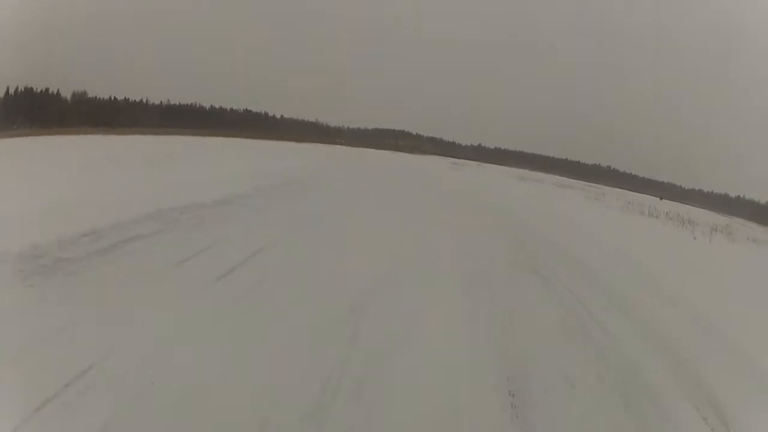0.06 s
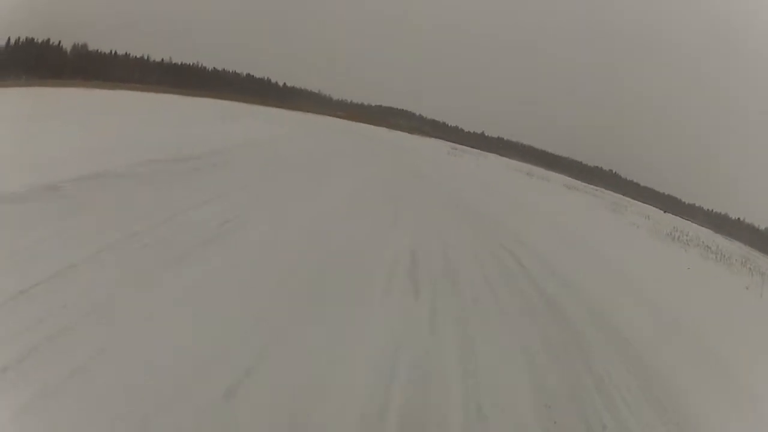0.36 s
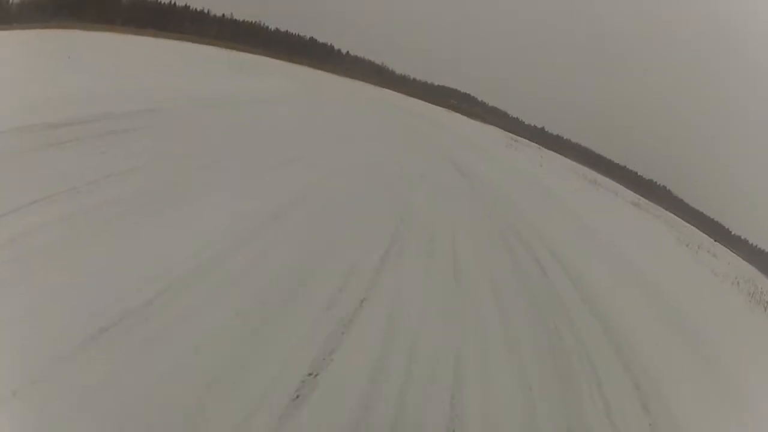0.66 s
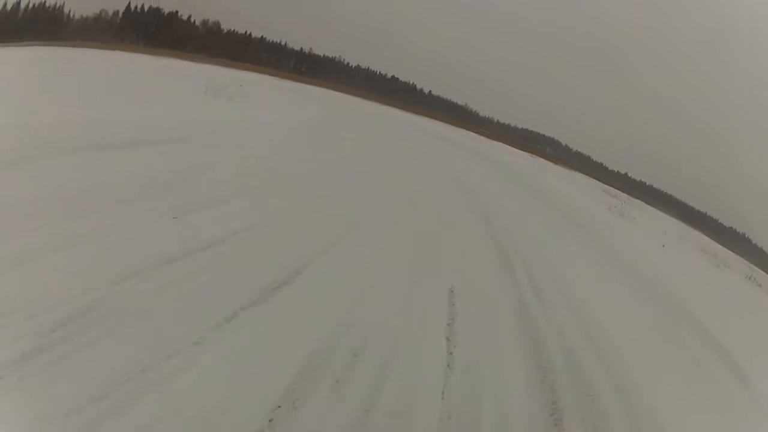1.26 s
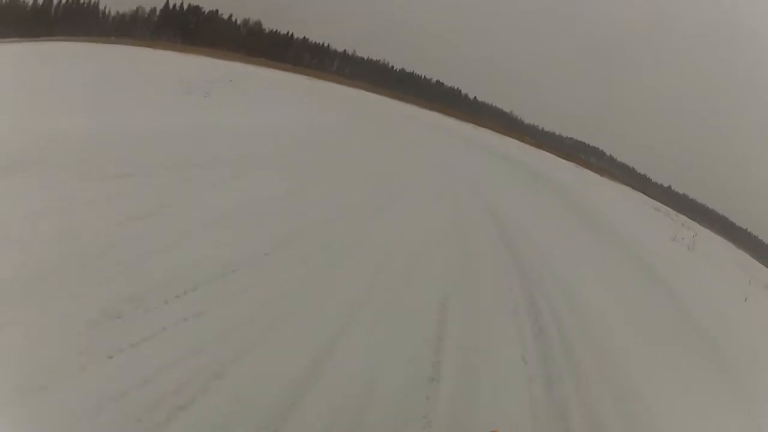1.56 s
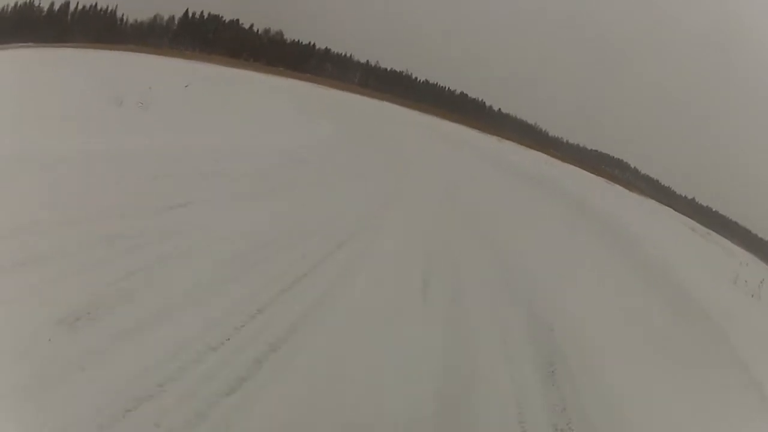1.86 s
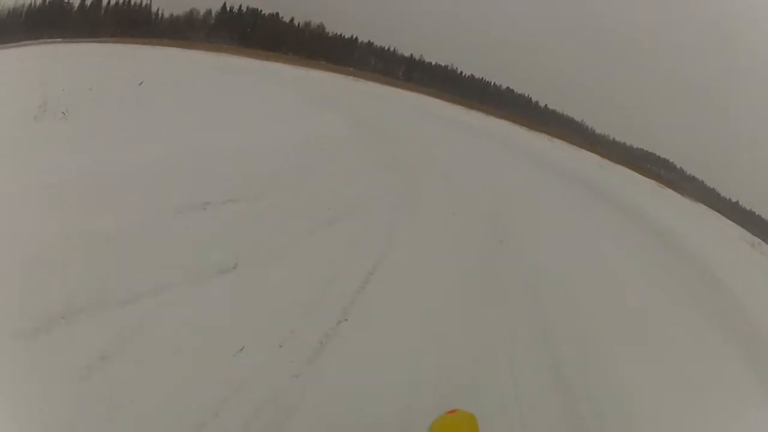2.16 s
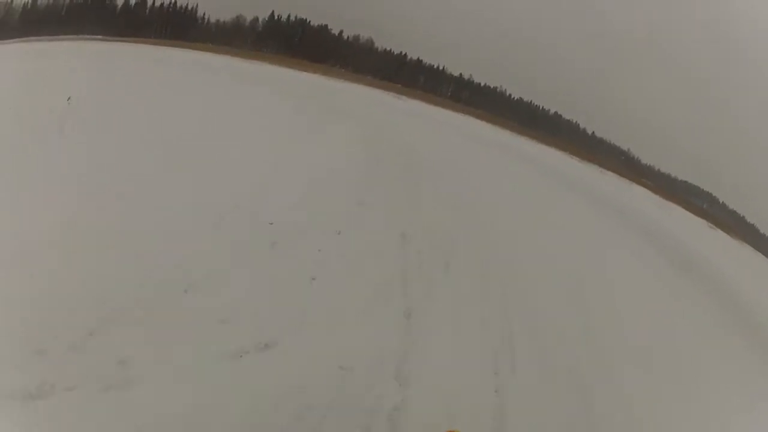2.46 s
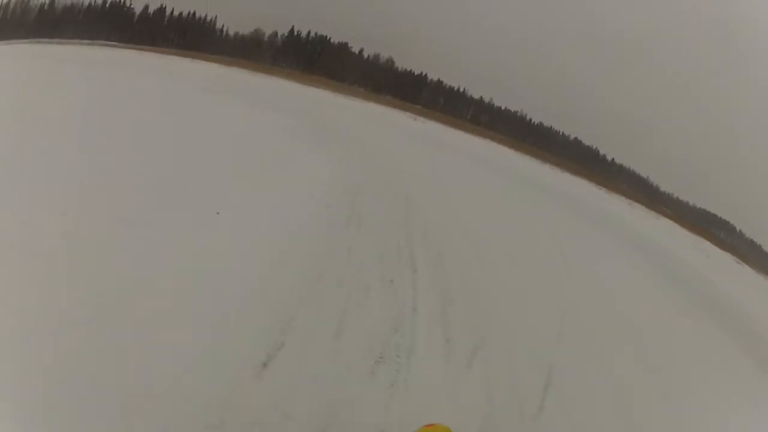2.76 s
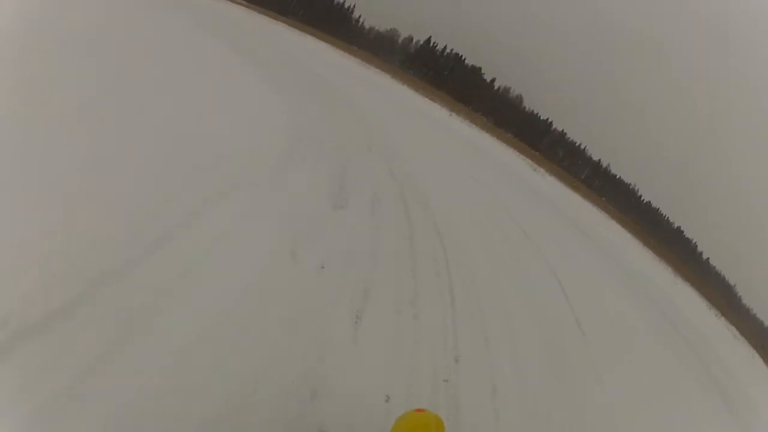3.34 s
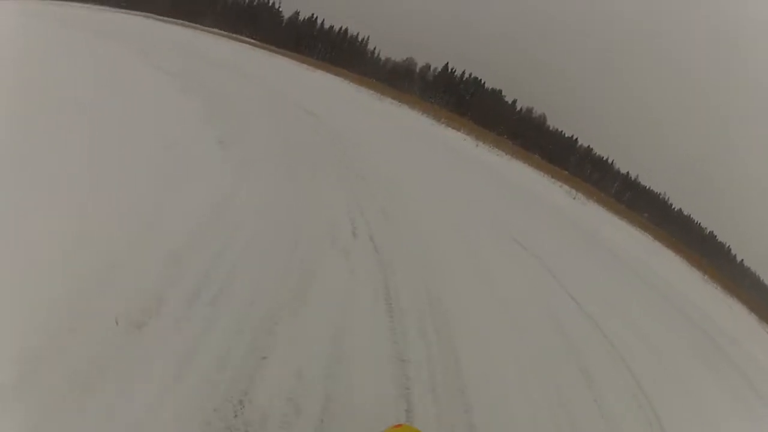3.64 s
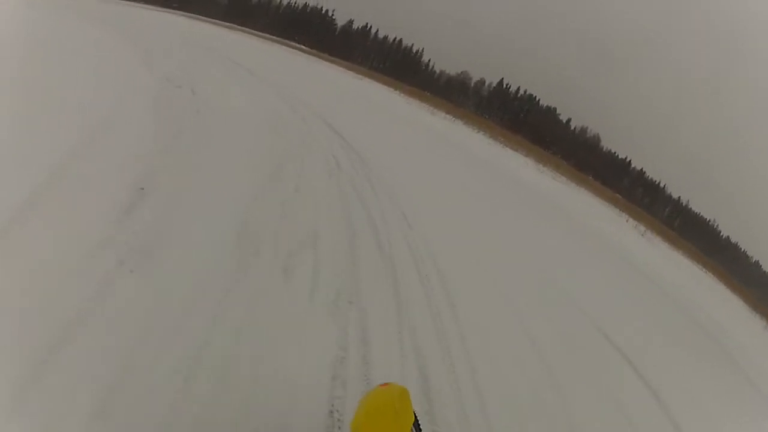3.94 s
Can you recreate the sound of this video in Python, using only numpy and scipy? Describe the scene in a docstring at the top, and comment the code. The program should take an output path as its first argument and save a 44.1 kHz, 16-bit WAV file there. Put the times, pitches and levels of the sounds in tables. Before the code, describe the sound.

Gear scrapes over ice under a light vehicle, rumbling, then knocking and chattering through a skid.

```python
"""On a frozen lake, microphone on board a light vehicle, close to the running gear.
The ice scrapes through the ringing gear, fading as the vehicle slows into a turn.
Bumps make the frame boom and rumble; ice chips tick against it and the gear takes two hard knocks.
In the turn it skids and chatters sideways, in stick-slip bursts that merge into a low buzz."""
import sys
import numpy as np
from scipy.fft import rfft, irfft, next_fast_len
from scipy.io import wavfile
from scipy.ndimage import uniform_filter1d, map_coordinates

SR = 44100
rng = np.random.default_rng(int(sys.argv[2]) if len(sys.argv) > 2 else 0)


def to_wav(s):
    """Save 16-bit WAV."""
    ch = np.atleast_2d(s).T  # columns
    pcm = np.round(np.clip(ch, -1, 1) * 32767)  # PCM
    wavfile.write(sys.argv[1], SR, pcm.astype(np.int16))


N = 176400  # 4 s


def amp(db):
    """Decibels to gain."""
    return 10 ** (np.asarray(db) / 20)


def unit(x):
    """x scaled to rms 1."""
    return x / np.sqrt(np.mean(x ** 2) + 1e-20)


def since(start):
    """Seconds since start at each sample, zero before it."""
    return np.maximum(np.arange(N) / SR - start, 0)


def curves(rows):
    """One value per sample for each column after the time."""
    times, *columns = np.transpose(rows)
    return [np.interp(np.arange(N) / SR, times, column) for column in columns]


def wobble(rate):
    """A smooth random curve, rate knots a second."""
    knots = rng.standard_normal(int(N * rate / SR) + 4)
    return map_coordinates(knots, [np.arange(N) * rate / SR])


def filtered(x, response):
    """x through a gain given as a function of frequency."""
    size = next_fast_len(N + SR // 2)
    return irfft(rfft(x, size) * response(np.fft.rfftfreq(size, 1 / SR)), size)[:N]


def coloured(x, points):
    """x shaped by (f/Hz, level/dB) points on a log frequency axis, at rms 1."""
    f, db = np.transpose(points)
    return unit(filtered(x, lambda hz: amp(np.interp(np.log(hz + 1), np.log(f), db))))


def noise(points):
    """Coloured noise of rms 1."""
    return coloured(rng.standard_normal(N), points)


def evened(x, size):
    """x with chance swells longer than size samples levelled out, at rms 1."""
    power = np.abs(uniform_filter1d(x ** 2, size))
    return unit(x / np.sqrt(power + 1e-6))


def crunches(rows, colour, attack_s, rough_db):
    """Short gritty bursts that rise quickly and die away over their length."""
    envelope = np.zeros(N)
    for start, db, length in rows:
        age = since(start)
        envelope += amp(db) * (1 - np.exp(-age / attack_s)) * np.exp(-(age / length) ** 2)
    grit = rng.standard_normal(N) * amp(rough_db * wobble(900))
    return envelope * evened(coloured(grit, colour), size=300)


def roll(level_db=-42.5, sway_db=0.15):
    """A steady bed of rolling noise and air."""
    # spectrum of the bed: f/Hz, level/dB
    colour = [(30, -22), (130, 4), (200, -1), (300, -0.5), (400, -7.5), (540, -7), (680, -6), (850, -16),
              (1600, -21), (2300, -13.5), (3200, -19), (4500, -30), (6000, -32), (7000, -37),
              (10000, -21.5), (12000, -28), (15000, -28)]
    return amp(level_db + sway_db * wobble(8.2)) * noise(colour)


def drone():
    """Two hollow resonances of the body, shaken by the uneven ice."""
    # strength of the resonances: t/s, lower level/dB, upper level/dB
    levels = [(0, -40, -56), (0.7, -41.5, -46), (1.05, -41.5, -48), (1.38, -38, -41), (1.6, -43.5, -47),
              (2.2, -41, -51), (2.5, -51, -46), (3.3, -54, -50), (4, -58, -56)]
    # lower resonance: f/Hz, level/dB
    lower = [(130, -38), (165, 5), (192, 3.5), (225, -10), (270, -10), (400, -50), (1500, -90)]
    # upper resonance: f/Hz, level/dB
    upper = [(250, -36), (350, -12.5), (405, 1.5), (460, -2.5), (600, -40), (2000, -90)]
    lower_db, upper_db = curves(levels)
    return amp(lower_db) * noise(lower) + amp(upper_db) * noise(upper)


def sing(width_hz=50):
    """The sliding gear sings in a narrow band that sinks with the speed."""
    # centre of the band: t/s, f/Hz, level/dB
    track = [(0, 729.6, -40), (1, 715.7, -43), (1.3, 690, -44), (1.39, 725, -42), (1.48, 707, -44),
             (1.82, 715, -42), (2, 703.8, -45), (3, 698.4, -47), (3.5, 679, -48.5), (4, 649, -52.5)]
    hz, level_db = curves(track)
    band = wobble(2 * width_hz) + 1j * wobble(2 * width_hz)
    carrier = np.exp(2j * np.pi * np.cumsum(hz) / SR)
    return amp(level_db) * unit(np.real(band * carrier))


def skid():
    """A dull rasp while the vehicle slides sideways."""
    # swell in the turn: t/s, level/dB
    levels = [(3.5, -70), (3.66, -46.5), (3.8, -46.5), (4, -43)]
    # spectrum of the rasp: f/Hz, level/dB
    colour = [(600, -42), (1200, -7), (1650, 7), (1950, -5), (2250, -2), (2800, -17), (3500, -14),
              (5000, -30), (9000, -50)]
    level_db, = curves(levels)
    return amp(level_db) * noise(colour)


def chips():
    """Ice chips tick against the vehicle."""
    # hits: t/s, level/dB, length/s
    hits = [(2.776, -39.5, 0.0089), (2.8685, -30, 0.0044), (2.876, -28.5, .012), (2.920, -34.5, .011),
            (2.996, -27, .005), (3.053, -37, 0.01), (3.152, -36.5, 0.013), (3.182, -41, .01),
            (3.212, -42, 0.0086), (3.481, -42.5, 0.0077), (3.556, -45, .008), (3.604, -41.5, 0.013),
            (3.824, -37, 0.014), (3.864, -36.5, 0.0093)]
    # spectrum of a tick: f/Hz, level/dB
    colour = [(500, -40), (2500, -24), (3500, 3), (4200, 1), (5200, -6), (6000, -15), (7000, -7),
              (8300, -4.5), (9500, -19), (15000, -32)]
    return crunches(hits, colour, attack_s=0.0012, rough_db=4.5)


def knocks():
    """Hard knocks on the gear: a crack, then a brief ring."""
    # hits: t/s, level/dB, crack length/s
    hits = [(3.0042, -24, .0035), (3.1415, -29.5, .006)]
    # spectrum of the crack: f/Hz, level/dB
    colour = [(100, -14), (700, -4), (1400, 0), (2300, 0), (3500, -6), (5000, -10), (6000, -16),
              (7000, -12), (10000, -14), (12000, -27), (14500, -17)]
    # modes of the gear: f/Hz, level/dB relative to the hit, t60/s
    modes = [(740, -8, .035), (980, -8, .03), (1290, -2, .035), (1720, -6, .03), (2240, -3, .03)]
    out = crunches(hits, colour, attack_s=0.00029, rough_db=2)
    for start, hit_db, _ in hits:
        age = since(start)
        for hz, mode_db, t60 in modes:
            out += amp(hit_db + mode_db - 60 * age / t60) * np.sin(2 * np.pi * hz * age)
    return out


def thuds(ring_hz=117, t60_s=0.22):
    """Single bumps set the frame ringing, low and dull."""
    # bumps: t/s, level/dB
    bumps = [(2.395, -24), (3.143, -26), (3.872, -25)]
    out = np.zeros(N)
    for start, db in bumps:
        age = since(start)
        out += amp(db - 60 * age / t60_s) * np.sin(2 * np.pi * ring_hz * age)
    return out


def frame(rumble_lift_db=2.0):
    """A run of bumps keeps the frame's low resonance booming over a deep rumble."""
    # surges of the boom: t/s, level/dB
    boom_levels = [(0.0, -29.5), (0.1, -23), (0.13, -36), (0.18, -27.5), (0.52, -27.5), (0.56, -35),
                   (0.58, -25.5), (0.95, -33), (0.96, -27.5), (1.16, -38.5), (1.27, -30.5), (1.34, -50),
                   (1.37, -36.5), (1.67, -30), (1.7, -38), (1.79, -26.5), (1.85, -44), (1.87, -36),
                   (2.0, -30), (2.04, -39.5), (2.29, -27), (2.33, -36), (2.41, -41), (2.44, -42),
                   (2.94, -35), (3.01, -44), (3.06, -31), (3.46, -50.5), (3.62, -40), (3.82, -49),
                   (3.89, -29), (4.0, -50)]
    # resonance of the frame: f/Hz, level/dB
    boom_colour = [(40, -38), (75, -8), (100, -3.5), (117, 6.5), (135, -4), (160, -19.5), (200, -19.5),
                   (280, -47), (600, -52.5)]
    # swells of the rumble: t/s, level/dB before the lift
    rumble_levels = [(0, -40), (0.035, -39), (0.08, -39), (0.3, -39), (0.6, -40), (1, -37.5), (1.45, -44),
                     (1.8, -46), (2.1, -43), (2.8, -43.5), (3, -37), (3.22, -34), (3.35, -46), (3.6, -46),
                     (3.67, -37), (3.75, -38), (3.88, -38), (4, -50)]
    # spectrum of the rumble: f/Hz, level/dB
    rumble_colour = [(8, -1), (22, 2), (32, -5.5), (48, -7.5), (68, -1), (90, -8), (150, -13), (400, -57)]
    boom_db, = curves(boom_levels)
    rumble_db, = curves(rumble_levels)
    boom = amp(boom_db) * evened(noise(boom_colour), size=2200)
    rumble = amp(rumble_db + rumble_lift_db) * evened(noise(rumble_colour), size=4400)
    return boom + rumble


def chatter(centre_hz=306, sweep_s_per_hz=1.6e-5, fade_db_per_s=600, scatter_db=0.5):
    """Stick and slip: each slip is a bending wave, highs arriving first; a burst holds, then dies."""
    # bursts: t/s, hold/s, peak level/dB, slip rate/Hz, pitch ratio
    bursts = [(1.93, .001, -28.5, 79, 1.54), (2.006, .001, -26, 76, 1.33), (2.055, 0.033, -29.5, 76, 1.27),
              (2.091, 0.031, -25.5, 77, 1.06), (2.1675, 0.0095, -21.5, 76, 1.15),
              (2.232, 0.009, -27.5, 72, 1.25), (3.555, .001, -29.5, 68, 0.96),
              (3.5994, .017, -22.5, 65, 0.94), (3.628, 0.019, -27, 69.8, 0.89),
              (3.661, 0.0057, -19.5, 69, 1), (3.7043, 0.0057, -19.5, 72, 1), (3.7638, 0.011, -19.5, 68, 1),
              (3.8072, .22, -21.5, 71, 1)]
    # spectrum of a slip at pitch ratio 1: f/Hz, level/dB
    colour = [(100, -30), (150, -19), (205, 1), (285, 1), (355, 1), (425, -10), (500, -14), (570, -20),
              (650, -16), (850, -31), (1500, -60)]
    colour_hz, colour_db = np.transpose(colour)
    out, size = np.zeros(N + SR), 4096
    for start, hold, db, rate, ratio in bursts:
        hz = np.fft.rfftfreq(size, 1 / SR) / ratio  # transposes both colour and sweep
        gain = amp(np.interp(hz, colour_hz, colour_db, right=-120))
        dispersion = np.exp(1j * np.pi * sweep_s_per_hz * (hz - centre_hz) ** 2)
        slip = np.fft.fftshift(irfft(gain * dispersion))
        slip /= np.abs(slip).max()
        for age in np.arange(int(hold * rate) + 4) / rate:
            level_db = db - fade_db_per_s * max(age - hold, 0) + scatter_db * rng.standard_normal()
            first = round((start + age) * SR) - size // 2
            out[first:first + size] -= amp(level_db) * slip
    return out[:N]


def scrape(grains_per_s=900, grain_db=-8, flutter_db=0.49, judder_db=0.5, drive_db=1.0, split_hz=2800):
    """Fine friction and coarser ice grains excite the running gear; slower is quieter and duller."""
    # fade with the speed, before the drive: t/s, middle level/dB, treble level/dB
    levels = [(0, -25, -25.5), (0.25, -26.5, -26), (0.5, -26, -26), (0.75, -27, -27), (1, -30.5, -28.5),
              (1.4, -32, -31.5), (1.8, -33.5, -33.5), (2.05, -32, -31.5), (2.35, -36.5, -37),
              (2.9, -38, -39.5), (3.15, -40.5, -42), (3.4, -43, -46), (3.7, -42.5, -43.5), (4, -41, -42.5)]
    # broad resonances of the gear: f/Hz, level/dB
    gear = [(200, -12), (400, -5), (560, -11), (720, -1), (860, -8.5), (980, -2), (1100, -7), (1270, 2),
            (1450, -4.5), (1700, 0), (2000, -3), (2250, 1.5), (2600, -7.5), (2850, -9), (3150, -5),
            (3520, -2.5), (4080, -15.5), (4420, -21.5), (4900, -8), (5170, -8.5), (5600, -25),
            (6030, -32.5), (6500, -22), (6830, -11.5), (7100, -11.5), (7600, -26), (8000, -20),
            (8500, -9.5), (9300, -20), (9750, -12.5), (10700, -20.5), (11500, -31.5), (12400, -40),
            (13400, -20), (14250, -14), (14700, -32), (15100, -16)]
    middle_db, treble_db = curves(levels)
    grains = unit((rng.random(N) < grains_per_s / SR) * rng.standard_normal(N))
    friction = rng.standard_normal(N) + amp(grain_db) * grains
    flicker = amp(flutter_db * wobble(24.59) + judder_db * wobble(140))
    rasp = coloured(friction * flicker, gear)
    middle = filtered(rasp, lambda hz: 1 / (1 + (hz / split_hz) ** 10))
    treble = rasp - middle
    return amp(drive_db) * (amp(middle_db) * middle + amp(treble_db) * treble)


def scene():
    """All that reaches the on-board microphone, in mono."""
    ice = chips() + scrape() + skid() + sing()
    ride = drone() + frame() + thuds() + roll()
    return (ice + ride + knocks() + chatter())[None]


def record(dry):
    """The microphone passes nothing above its band limit."""
    top_hz = 15350
    return np.array([filtered(channel, lambda hz: hz < top_hz) for channel in dry])


dry = scene()
out = record(dry)
to_wav(out)
```